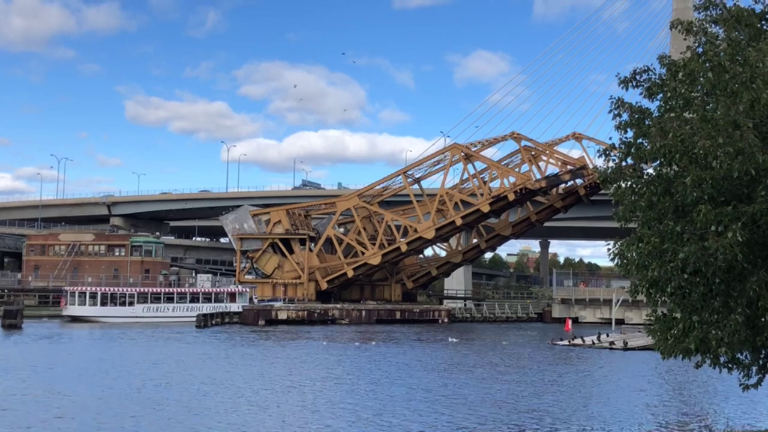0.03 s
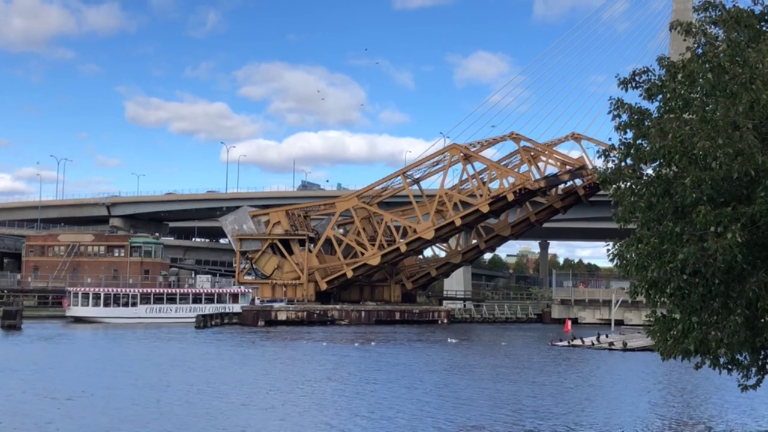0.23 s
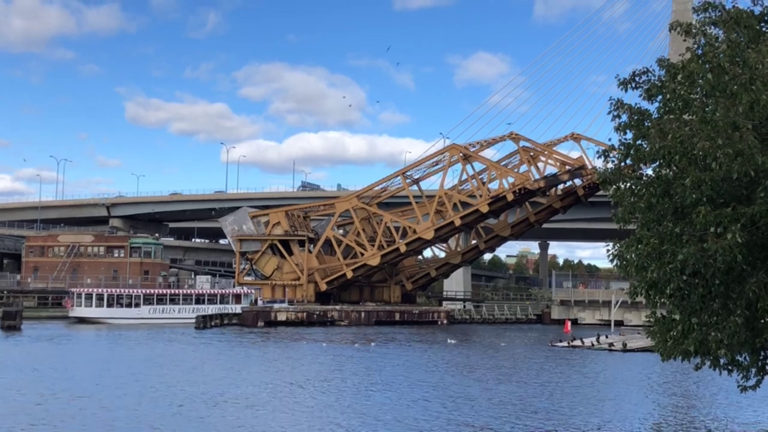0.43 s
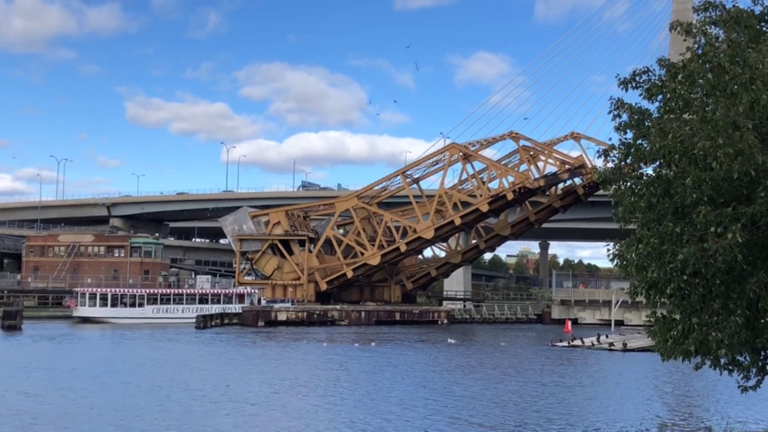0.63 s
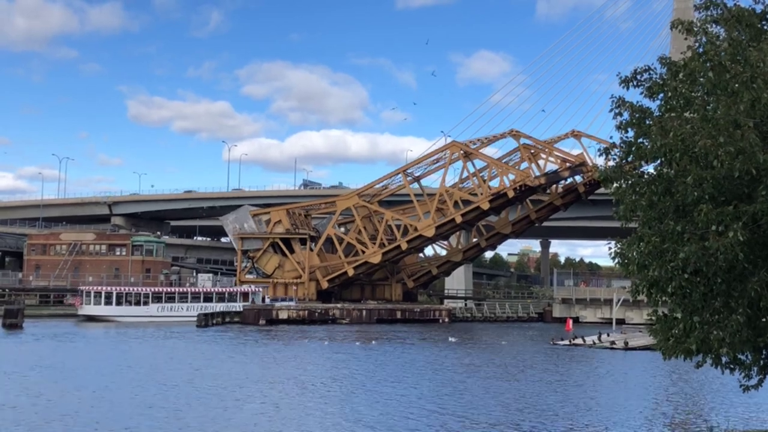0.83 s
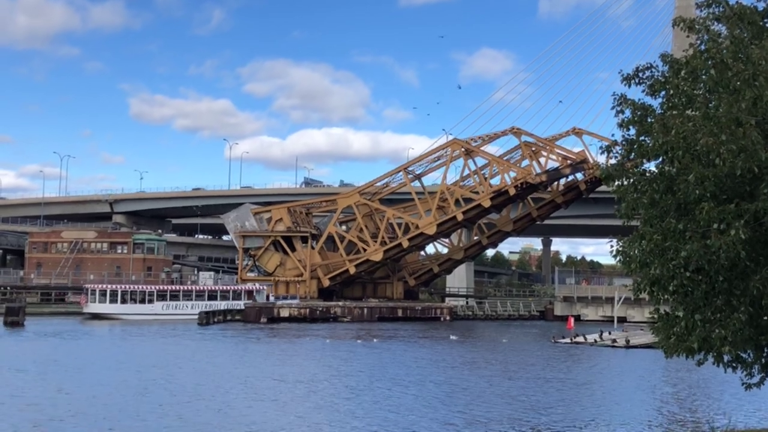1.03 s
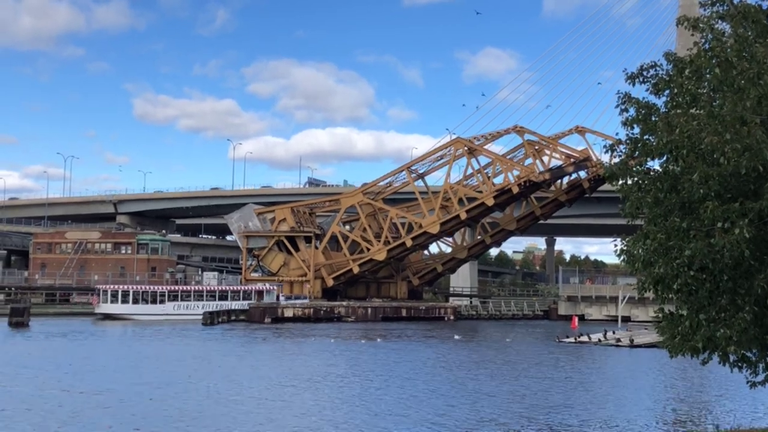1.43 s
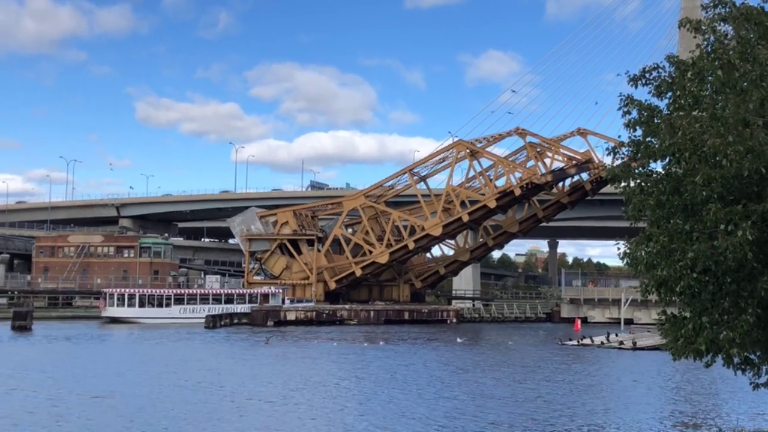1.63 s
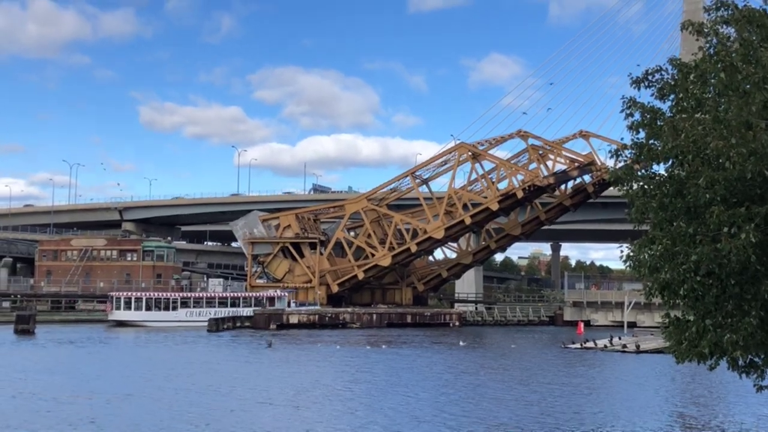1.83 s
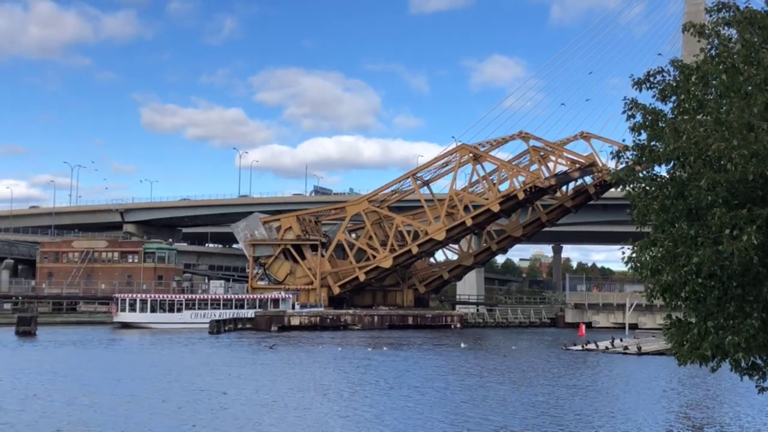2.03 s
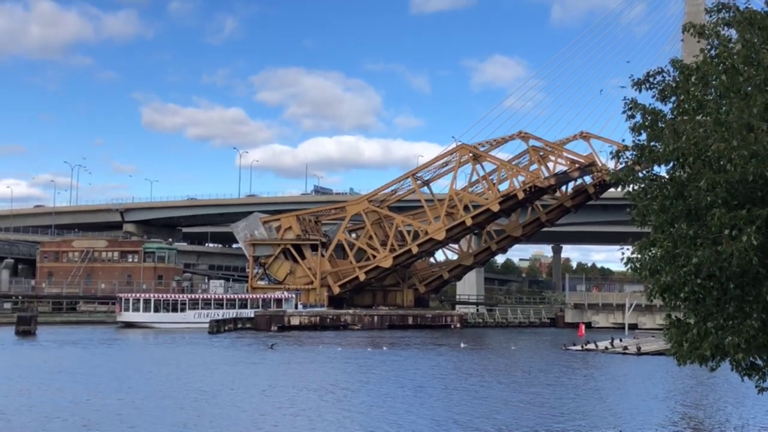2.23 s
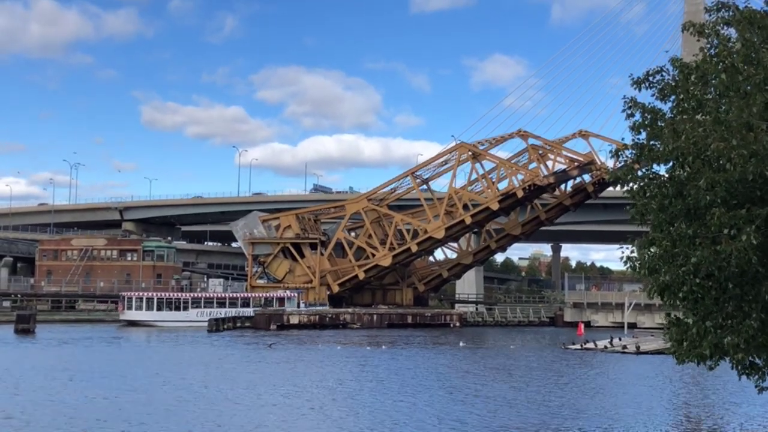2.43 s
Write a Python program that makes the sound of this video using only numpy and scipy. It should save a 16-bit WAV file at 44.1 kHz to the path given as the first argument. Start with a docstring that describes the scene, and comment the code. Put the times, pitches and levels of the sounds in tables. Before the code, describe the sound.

A heavy steel clank booms from a drawbridge at about 0.2 seconds, a sharp crack with quick rebounds and a faint, thin squeak just after. Its low ring echoes away over the river, fading by about 1.5 seconds. Distant highway traffic rumbles throughout, and wind buffets the microphone, easing near the end. A deep rumble swells around 1.2 seconds, and a faint high hiss slowly rises until about 2 seconds.

```python
"""One heavy steel clank booms from a drawbridge, heard from the river bank.
Metal hits metal with a crack, and the steel rings with a few low notes. The sound bounces off the
structures and rolls away over the water, with a thin squeak just after the hit.
Behind it, distant highway traffic rumbles, wind buffets the microphone
and a faint high hiss slowly swells."""
import sys
import numpy as np
from scipy import signal
from scipy.fft import rfft, irfft, next_fast_len
from scipy.io import wavfile
from scipy.ndimage import uniform_filter1d, minimum_filter1d, map_coordinates

SR = 44100
rng = np.random.default_rng(int(sys.argv[2]) if len(sys.argv) > 2 else 0)


def unload_wav(signal):
    """Save mono or channel-first audio to the path in sys.argv[1] as 16-bit WAV at rate SR, clipped to [-1, 1]."""
    wavfile.write(
        sys.argv[1],
        SR,
        np.round(np.clip(np.atleast_2d(signal).T, -1, 1) * 32767).astype(np.int16),
    )


N = 114660
CLANK_S = .241  # when the steel is hit


def amp(db):
    """Turn decibels (dB) into a number to multiply a sound by."""
    return 10 ** (np.asarray(db) / 20)


def unit(x):
    """Scale a sound to an average power of 1."""
    return x / np.sqrt(np.mean(x ** 2) + 1e-20)


def clock():
    """The time of every sample, in seconds."""
    return np.arange(N) / SR


def along(points, hz):
    """Read between (Hz, value) points, with frequency spaced by octaves."""
    freqs, values = np.transpose(points)
    return np.interp(np.log(hz + 1), np.log(freqs + 1), values)


def curve(rows):
    """Join (seconds, value) points with straight lines."""
    return np.interp(clock(), *np.transpose(rows))


def wobble(rate):
    """A smooth curve through `rate` random values a second."""
    return map_coordinates(rng.standard_normal(400), [clock() * rate], mode="wrap")


def filtered(x, response):
    """Multiply each frequency in a sound by response(hz)."""
    size = next_fast_len(N + SR // 2)
    hz = np.fft.rfftfreq(size, 1 / SR)
    return irfft(rfft(x, size) * response(hz), size)[:N]


def noise(colour):
    """Noise of power 1. Its colour says how strong the low and high frequencies are."""
    return unit(filtered(rng.standard_normal(N), lambda hz: amp(along(colour, hz))))


def tone(hz, wander_hz, rate):
    """A note of power 1 whose pitch wanders at random."""
    pitch = hz + wander_hz * wobble(rate)
    return unit(np.sin(2 * np.pi * np.cumsum(pitch) / SR))


def struck(start_s, rise_s, fade_s):
    """The loudness of a hit: it rises, then drops 60 dB over each fade time."""
    age = np.maximum(clock() - start_s, 0)
    return (1 - np.exp(-age / rise_s)) * np.exp(-np.log(1000) * age / fade_s)


def hump(peak_s, half_s):
    """A smooth rise and fall in loudness."""
    return np.exp(-((clock() - peak_s) / half_s) ** 2)


def traffic():
    """A far highway roars, with faint tyre whines and one brief swell."""
    # Each row: frequency in Hz, relative level in dB.
    roar_colour = [(20, -45.5), (45, 0), (85, 2), (130, -6), (200, -6), (290, -4), (400, -8.5),
                   (600, -12.5), (1000, -18), (1450, -27), (2000, -37), (3000, -43.5), (5000, -51),
                   (15000, -57)]
    swell_colour = [(100, -30), (250, 6), (520, 4.5), (700, -7), (1200, -27), (2500, -46)]
    # Each row: pitch of a tyre whine in Hz, level in dB.
    tyre_notes = [(840, -53), (1244, -58), (1441, -58.5)]
    roar = noise(roar_colour) * amp(-25 - .5 * clock() + .45 * wobble(7.82))  # sways and slowly fades
    swell = noise(swell_colour) * amp(-26.5) * hump(peak_s=.913, half_s=.053)
    tyres = sum(amp(db + 2 * wobble(7.36)) * tone(hz, wander_hz=6.4, rate=33) for hz, db in tyre_notes)
    return roar + swell + tyres


def wind():
    """Gusts buffet the microphone, and single swirls of air push, then pull at its opening."""
    # Each row: frequency in Hz, relative level in dB.
    colour = [(10, -6.5), (25, 0.5), (60, -1.5), (110, -2.5), (190, -3.5), (300, -10.5), (600, -36.5),
              (2000, -60)]
    # Each row: time in seconds, level in dB.
    gusts = [(0, -54), (.08, -64), (.2, -27.5), (.33, -23), (.68, -21), (1.04, -24), (1.2, -22),
             (1.34, -25), (1.41, -28.5), (1.56, -22.5), (1.7, -26.5), (1.79, -34), (2.2, -30.5), (2.6, -50)]
    # Each row: middle of a swirl in seconds, half its length in seconds, level in dB.
    swirls = [(.522, 0.0021, -10), (0.685, 0.0023, -20.5), (.78, 0.0024, -14), (1.642, 0.0028, -18.5),
              (1.696, 0.002, -21.5), (1.969, 0.0089, -17), (2.297, 0.0052, -15.5)]
    buffet = noise(colour) * amp(curve(gusts) + .84 * wobble(21.94))
    for middle_s, half_s, db in swirls:
        offset = (clock() - middle_s) / half_s
        buffet -= amp(db) * offset * np.exp((1 - offset ** 2) / 2)
    return buffet


def hiss():
    """A smooth high hiss swells slowly."""
    # Each row: frequency in Hz, relative level in dB.
    colour = [(500, -5), (2500, -13.5), (5000, -2.5), (8000, -2), (11500, 0), (15500, 2)]
    # Each row: time in seconds, level in dB.
    levels = [(0, -55), (.22, -54.5), (.3, -55.5), (.5, -53.5), (1.1, -51), (1.7, -48), (2.15, -47.5),
              (2.6, -48)]
    return noise(colour) * amp(curve(levels))


def crack():
    """Metal meets metal: short bright bursts, a rattle behind them and the first blow's hard knock."""
    # Each row: start in seconds, level in dB, fade time in seconds.
    contacts = [(0.2385, -35.5, 0.074), (0.2467, -26, 0.027), (0.2526, -38.5, 0.053), (0.263, -45, .04),
                (0.273, -31, 0.038), (.2965, -44, .03)]
    # Each row: frequency in Hz, relative level in dB.
    burst_colour = [(400, 8), (900, 12.5), (1500, 11), (2000, -7), (2700, 10), (3500, 1.5), (4000, 5.5),
                    (4600, -3), (5150, 5), (6000, 2), (7000, -13), (9300, -15), (11000, -28), (15000, -41)]
    rattle_colour = [(1200, -11), (2200, -20), (3100, 0), (4200, -13), (5200, -4), (6500, -24),
                     (12000, -29)]
    knock_colour = [(200, -22), (500, -5), (950, 1.5), (1300, -3.5), (1650, -9), (2100, -22.5), (4000, -29),
                    (6000, -42), (8000, -31), (9400, -32), (11500, -47)]
    hits = sum(amp(db) * struck(start_s, .001, fade_s) for start_s, db, fade_s in contacts)
    bursts = noise(burst_colour) * hits
    rattle = noise(rattle_colour) * amp(-47.5 + 1.8 * wobble(90))
    rattle *= struck(CLANK_S, rise_s=.001, fade_s=.7)
    knock = noise(knock_colour) * amp(-22) * struck(CLANK_S, rise_s=.008, fade_s=.15)
    return bursts + rattle + knock


def boom():
    """The clank and each of its rebounds is a short swell of the steel's own low notes."""
    # Each row: start in seconds, relative level in dB, rise time in seconds, pitch in Hz.
    blows = [(0.2433, 0.5, 0.0057, 318), (0.2586, -1.5, 0.0049, 318.6), (0.2738, 1.5, 0.0098, 278),
             (.304, -8.5, 0.0079, 300.4), (0.3326, -1.5, 0.0038, 267), (0.381, -8.5, 0.0062, 281),
             (0.387, -6, 0.0094, 283.6), (0.428, -16, 0.0073, 286), (0.467, -15, 0.0039, 279)]
    # Each row: a note as a multiple of the blow's pitch, relative level in dB.
    steel_notes = [(.7, -16), (1, -0.5), (1.24, -17.5), (1.7, -15.5), (2.2, -24)]
    sound = np.zeros(N)
    for start_s, db, rise_s, hz in blows:
        age = np.maximum(clock() - start_s, 0)
        swell = (age / rise_s * np.exp(1 - age / rise_s)) ** 2
        ring = sum(amp(note_db) * np.sin(2 * np.pi * (hz * multiple * age + rng.random()))
                   for multiple, note_db in steel_notes)
        sound += amp(db) * swell * ring
    return amp(-2) * sound


def rolling_echo():
    """The clank rolls away over the water. The highest part dies first, and a few notes ring on."""
    # Each row: frequency in Hz, relative level in dB.
    colour = [(90, -27), (170, -6.5), (235, -7.5), (278, 1), (310, -9), (360, 2.5), (430, -10.5),
              (650, -14), (1000, -29.5), (1500, -31.5), (2000, -50), (3200, -51), (6000, -63), (10000, -76)]
    # Each row: frequency in Hz, fade time in seconds.
    fade_times = [(150, 2.2), (280, 1.77), (600, 1.6), (1500, 1.6), (3000, 2), (6000, 0.66)]
    # Each row: pitch in Hz, level in dB, fade time in seconds.
    lingering_notes = [(276.8, -18, 1.68), (366, -41, 2), (479.7, -35, 6.6)]
    rise_s = .026
    # Split the noise into frequency bands so each can fade at its own speed.
    band_hz, times, bands = signal.stft(noise(colour), SR, nperseg=1024)
    age = np.maximum(times - CLANK_S, 0)
    fade = np.exp(-np.log(1000) * age / along(fade_times, band_hz)[:, None])
    echo = signal.istft(bands * fade, SR, nperseg=1024)[1][:N]
    echo *= struck(CLANK_S, rise_s, fade_s=np.inf)  # silent until the hit
    ring = sum(amp(db) * tone(hz, wander_hz=4.14, rate=18) * struck(CLANK_S, rise_s, fade_s)
               for hz, db, fade_s in lingering_notes)
    return amp(-14) * echo + ring


def squeak():
    """One thin, slightly rough high note swells and fades in a few pushes."""
    # Each row: loudest moment in seconds, half the length in seconds, level in dB.
    pushes = [(0.314, 0.01, -53), (0.334, 0.01, -51), (0.375, 0.024, -58.5), (.44, 0.092, -70)]
    loudness = sum(amp(db) * hump(peak_s, half_s) for peak_s, half_s, db in pushes)
    roughness = amp(2.5 * wobble(140))
    return loudness * roughness * tone(hz=5115, wander_hz=45, rate=220)


def deep_rumble():
    """The deepest rumble swells once and sinks again."""
    # Each row: frequency in Hz, relative level in dB.
    colour = [(20, -29), (45, 13.5), (65, 12.5), (90, 7.5), (130, -11), (300, -43)]
    return noise(colour) * amp(-24) * hump(peak_s=1.219, half_s=.15)


def scene():
    """The clank and its squeak over traffic, rumble, wind and hiss, in one channel."""
    clank = boom() + crack() + rolling_echo()
    return (clank + squeak() + traffic() + deep_rumble() + wind() + hiss())[None]


def record(dry):
    """A limiter briefly turns down the loudest peaks, then the very highest frequencies are cut."""
    ceiling, hold_s, top_hz = .82, .012, 15720
    window = int(hold_s * SR)
    needed_gain = ceiling / np.maximum(np.abs(dry[0]), ceiling)
    smooth_gain = uniform_filter1d(minimum_filter1d(needed_gain, window), window)
    return filtered(dry[0] * smooth_gain, lambda hz: hz < top_hz)[None]


dry = scene()
out = record(dry)
unload_wav(out)
```